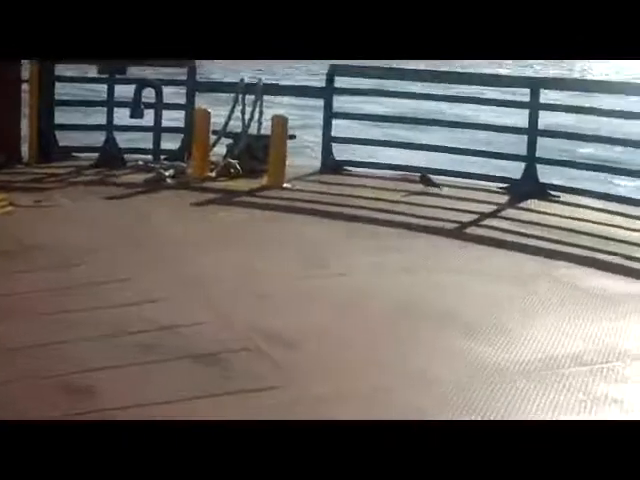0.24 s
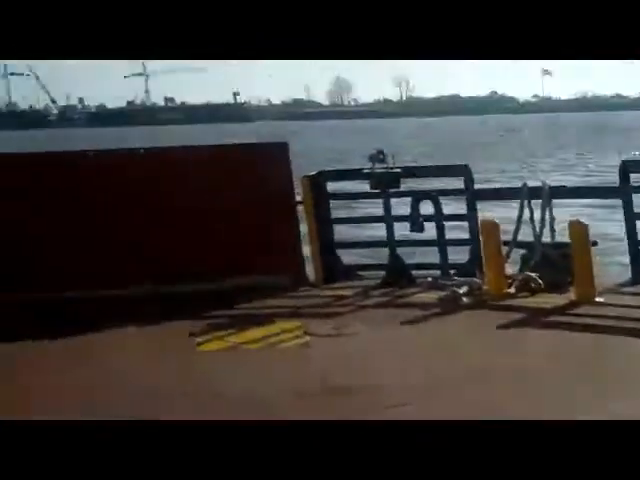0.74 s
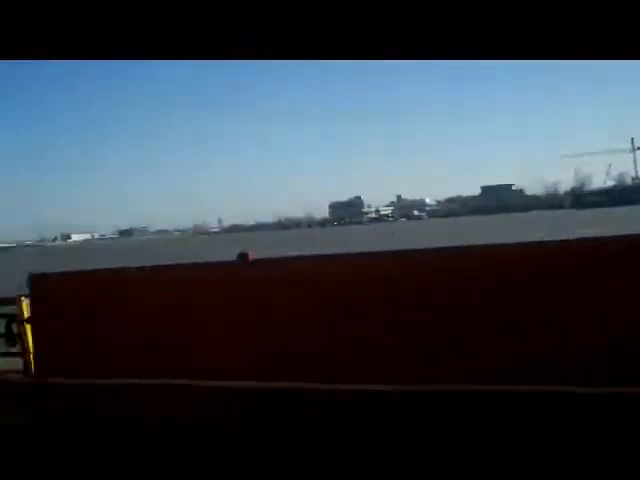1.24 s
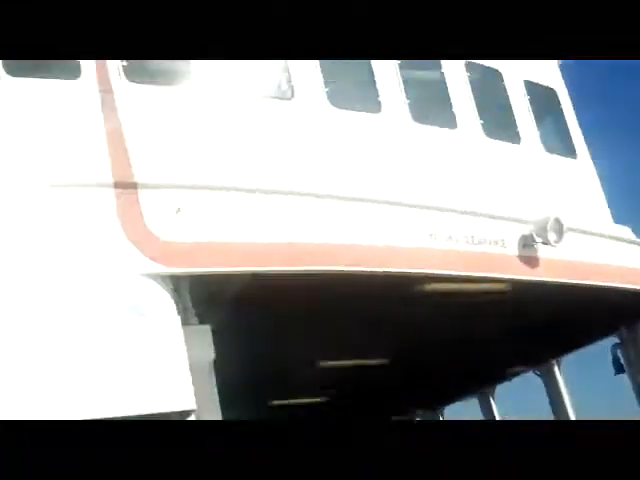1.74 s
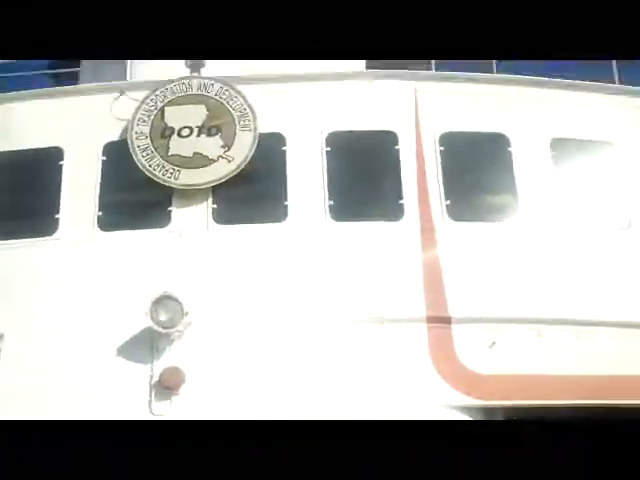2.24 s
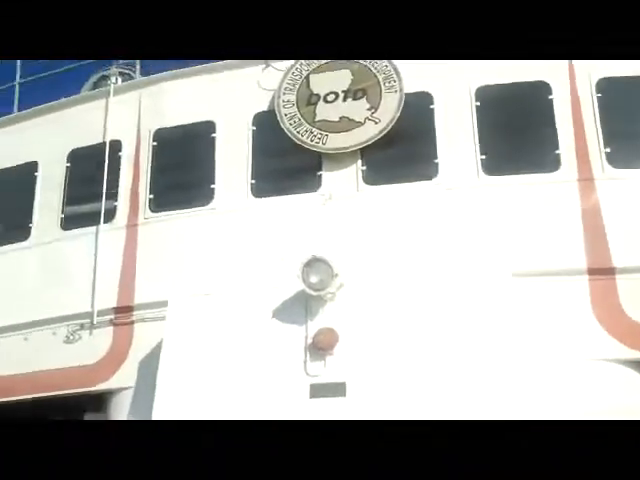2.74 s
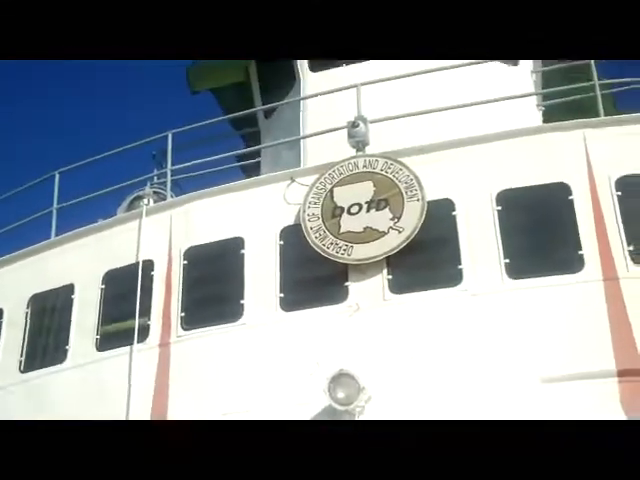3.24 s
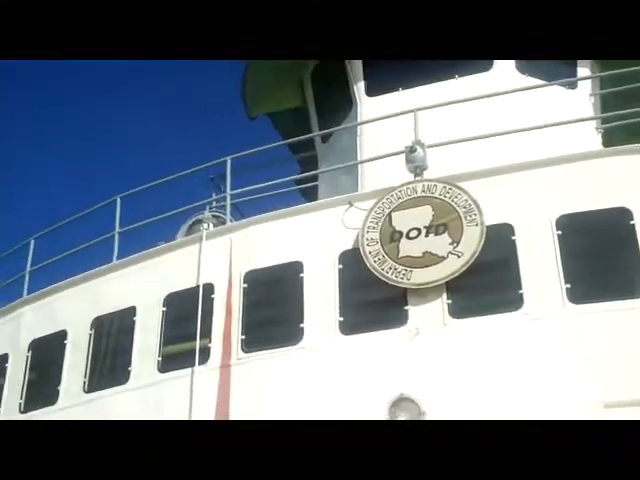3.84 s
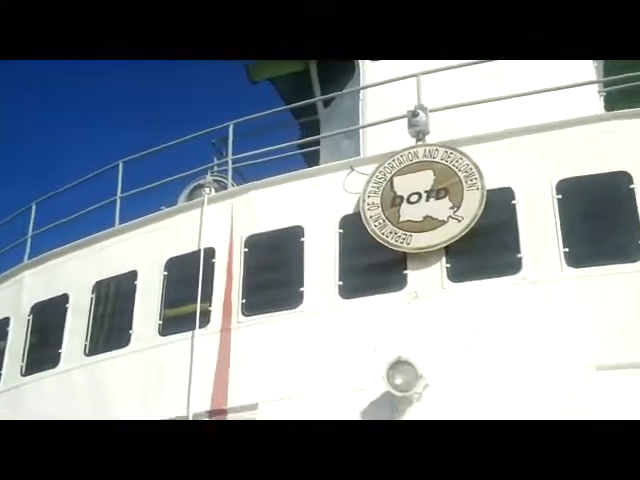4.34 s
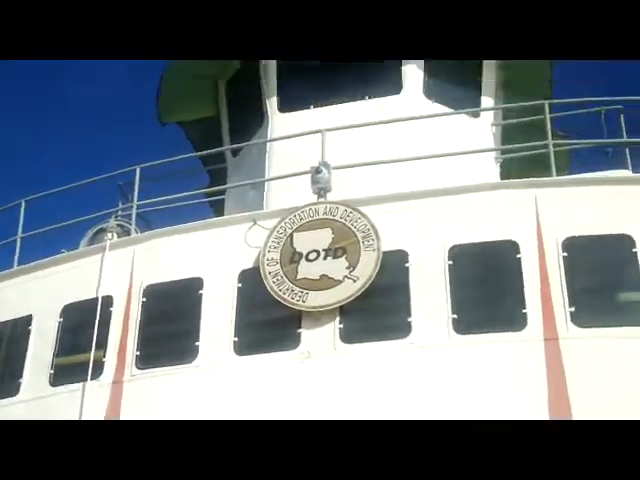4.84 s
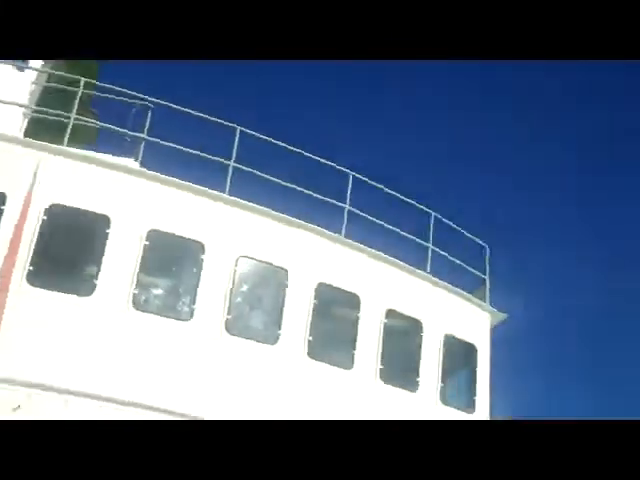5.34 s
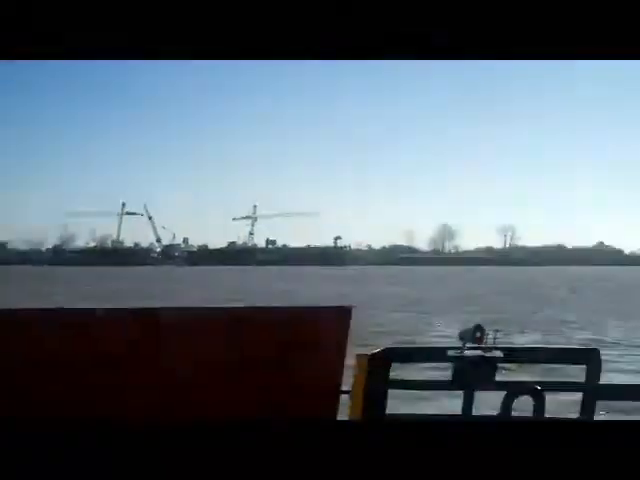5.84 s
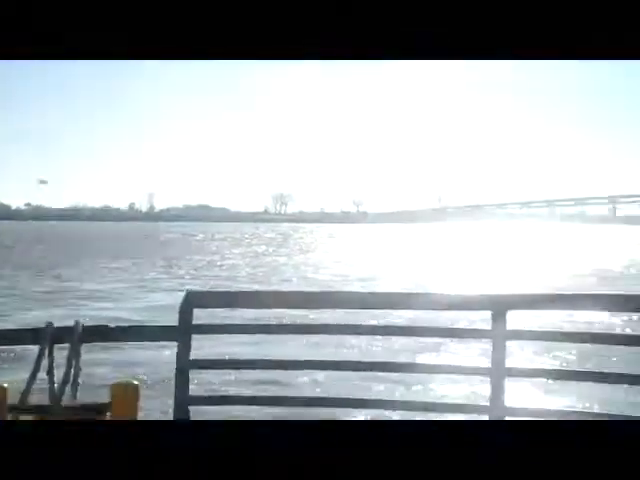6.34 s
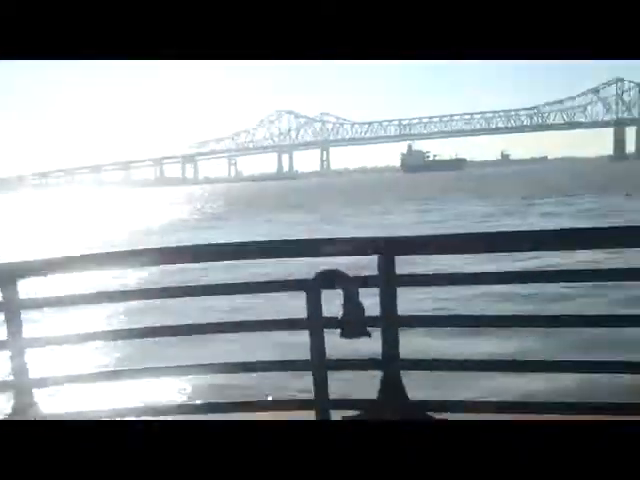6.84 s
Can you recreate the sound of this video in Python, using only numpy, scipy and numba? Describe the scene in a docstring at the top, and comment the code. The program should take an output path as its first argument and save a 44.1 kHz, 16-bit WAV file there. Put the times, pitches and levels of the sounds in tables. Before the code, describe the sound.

For about seven seconds, a river ferry's two diesel engines throb loudly and steadily, heard on the open deck through a hand-held microphone. A generator clatters and fans hum under a roar of exhaust and ventilation, with a faint high hiss on top. Wind rumbles on the microphone throughout, with short, low knocks. At about 0.5 seconds a small bird gives a quiet, thin, gliding two-note whistle. The deep exhaust boom builds by about 1 second and keeps pulsing in slow swells. The camera's plastic case ticks lightly now and then between 1.7 and 6 seconds, most clearly around 2.4, 3.1, 4.8 and 6. Just after 6 seconds the boom dips, a gust lands a short, hollow thump, and the boom surges back. The bird returns very faintly around 6.4 and 6.7 seconds. All along, the rumble overloads slightly, fluttering between left and right.

```python
"""Open deck of a river ferry, hand-held camera microphone. From the start two diesels throb and a
generator clatters under a roar of exhaust and ventilation. Half a second in, a small bird whistles;
then the exhaust boom builds, wind buffets the microphone and the camera's case ticks now and then.
Near six seconds a gust thumps and the bird returns faintly. All along, the rumble overloads two channels
that sit off centre in opposite directions: the left ducks on the crests, the right in the troughs."""
import sys
import numpy as np
from scipy import signal
from scipy.fft import rfft, irfft
from scipy.io import wavfile
from numba import njit

SR = 44100
rng = np.random.default_rng(int(sys.argv[2]) if len(sys.argv) > 2 else 0)


def bounce(signal):
    """Save signal as a 16-bit WAV file at the path given by the first command-line argument."""
    frames = np.transpose(np.atleast_2d(signal))
    limited = np.clip(frames, -1, 1)
    pcm = np.round(limited * 32767).astype(np.int16)
    wavfile.write(sys.argv[1], SR, pcm)


N = 312669
T = np.arange(N) / SR
HZ = np.fft.rfftfreq(N, 1 / SR)


def gain_of(db):
    """Decibels to amplitude."""
    return 10 ** (np.asarray(db) / 20)


def unit_rms(x):
    """Scales to an rms of one."""
    return x / np.sqrt(np.mean(x ** 2) + 1e-20)


def spectrum(points):
    """Joins (f/Hz, level/dB) points on a log axis, giving dB at every frequency."""
    hz, db = np.transpose(points)
    return np.interp(np.log(HZ + 1), np.log(hz + 1), db)


def follow(points):
    """Joins (t/s, value) points, giving a value at every sample."""
    return np.interp(T, *np.transpose(points))


def bell(s, spread_s):
    """A Gaussian swell to one at s seconds."""
    return np.exp(-.5 * ((T - s) / spread_s) ** 2)


def add(mix, s, sound):
    """Mixes a sound in at s seconds."""
    part = mix[round(s * SR):][:len(sound)]
    part += sound[:len(part)]


def wander(rate_hz, count=2048):
    """Random drift of rms one, mostly slower than the rate."""
    hz = np.fft.rfftfreq(count, T[-1] / count)
    slow = irfft(rfft(rng.standard_normal(count)) / np.sqrt(1 + (hz / rate_hz) ** 4))
    return np.interp(T, np.linspace(0, T[-1], count), unit_rms(slow))


def filtered_noise(shape):
    """White noise weighted by a gain at every frequency."""
    return irfft(rfft(rng.standard_normal(N)) * shape, N)


def noise(colour):
    """Noise of rms one; the colour sets only the shape of its spectrum."""
    return unit_rms(filtered_noise(gain_of(spectrum(colour))))


def facing_gain(river_db, cabin_db):
    """A source's gain as the microphone turns between the river and the cabin."""
    # where the microphone points: t/s, direction (0 = open river, 1 = cabin)
    facing = [(0, 0.43), (1.2, 0.69), (2.1, 0.88), (2.6, 0.57), (3.5, 0.86), (4.3, 0.91), (4.8, .75),
              (5.9, 0.7), (6.6, 0.12), (7.09, 0.31)]
    return gain_of(river_db + (cabin_db - river_db) * follow(facing))


def surge():
    """The gain of the machinery's midrange as the breeze carries it across the deck."""
    # rises and dips: t/s, change/dB, spread/s
    surges = [(.21, 2.2, .06), (.48, 1.5, .08), (1.55, 1.5, .06), (2.05, 1.2, .1), (2.55, 1.8, .1),
              (2.92, 1.6, .16), (4.05, -1.2, .1), (4.42, -1.2, .1), (4.73, 2.6, .05), (5.2, 1, .05),
              (5.56, 2, .08), (6.97, -1.3, .14)]
    return gain_of(sum(db * bell(s, spread) for s, db, spread in surges))


def exhaust_boom(in_step_s=1.822, waver_db=.63):
    """Deep exhaust notes, so close in pitch that they beat in slow swells and a quicker throb."""
    # exhaust notes: f/Hz, relative level/dB
    exhausts = [(33.18, -14.8), (32.84, -15.8), (35.02, -19.3)]
    # their joint swell: t/s, gain/dB
    swell = [(0, -5), (.6, -8), (1.15, 1.8), (2.3, 0.25), (2.6, -2.5), (3.1, -1), (5.2, 0), (5.6, -3),
             (5.85, 1.5), (6.05, -8), (6.17, -9.5), (6.35, 5.5), (6.7, 1.5), (7.09, 2)]
    notes = sum(gain_of(db + waver_db * wander(3)) * np.cos(2 * np.pi * hz * (T - in_step_s))
                for hz, db in exhausts)
    return gain_of(follow(swell)) * np.sqrt(2) * notes


def engine(swell, orders, shaft_hz, trim_db, waver_db, hunt):
    """Orders of one shaft whose speed hunts a little; moving air makes each order waver."""
    turns = np.cumsum(shaft_hz * (1 + hunt * wander(1.3))) / SR
    tones = sum(gain_of(db + waver_db * wander(2.2)) * np.sin(2 * np.pi * (order * turns + rng.random()))
                for order, db in orders)
    return gain_of(follow(swell) + trim_db) * np.sqrt(2) * tones


def diesels():
    """The ferry's two engines, running at slightly different speeds."""
    # each engine as heard on deck: t/s, relative level/dB
    first_swell = [(0, -24), (1, -23), (2.3, -19.5), (3.2, -21.5), (4.3, -17), (5.5, -16.5), (7.09, -19.5)]
    second_swell = [(0, -22.5), (.55, -21), (1.4, -22), (1.8, -26.5), (3.15, -30), (3.55, -21.5),
                    (4.9, -17), (6, -17.5), (6.4, -25), (6.8, -18), (7.09, -22.5)]
    # their tones: multiple of the shaft speed, relative level/dB
    first_orders = [(4, -14), (6, 0), (8, -7.5), (9, -9), (37, -26.5)]
    second_orders = [(7, -7), (8, -15.5), (10, -3), (20, -18.5)]
    first = engine(first_swell, first_orders, shaft_hz=11.64, trim_db=-1.1, waver_db=.9, hunt=.0025)
    second = engine(second_swell, second_orders, shaft_hz=11.315, trim_db=.74, waver_db=1.9, hunt=.002)
    return first + second


def hum_swells(trim_db=-.2):
    """Single low notes rise out of the rumble and sink back."""
    # brief notes: t/s, f/Hz, relative level/dB, spread/s
    notes = [(.4, 65.5, -16, .14), (.95, 98, -18, .07), (.95, 136, -20, .07), (1.38, 136, -19, .06),
             (1.51, 91, -18, .07), (1.51, 109, -18, .05), (2.08, 78, -19, .08), (2.08, 114, -17, .05),
             (2.42, 67, -18, .1), (2.5, 80, -18, .07), (2.56, 108, -15, .07), (2.8, 106, -17, .06),
             (3.14, 136, -19, .06), (3.8, 111, -16, .08), (3.92, 84, -18, .08), (4.3, 112, -19, .1),
             (4.35, 71, -15, .05), (4.45, 82, -17, .1), (5.55, 86, -20, .06), (5.47, 70, -15, .08),
             (6.18, 112, -16, .07), (6.28, 82, -18, .13), (6.92, 112, -15, .05), (6.9, 90, -19, .08)]
    hums = sum(gain_of(db + trim_db) * bell(s, spread) * np.sin(2 * np.pi * (hz * T + rng.random()))
               for s, hz, db, spread in notes)
    return np.sqrt(2) * hums


def generator(cycle_hz=15.105, firings=3, firing_db=2, between_db=-1, hunt=.0013, hum_order=9):
    """A fast diesel repeats one cycle of knocks and valve clatter at governed speed, above a low hum."""
    # clatter spectrum: f/Hz, relative level/dB per order
    colour = [(150, -39), (300, -43), (550, -52), (900, -49.5), (1200, -54.5), (1500, -64), (1750, -63.5),
              (2100, -61), (2400, -66.5), (3200, -73), (4000, -81)]
    # tones that stand out: multiple of the cycle rate, relative level/dB
    strong_orders = [(13, -36), (18, -32), (45, -47.5), (51, -45.5), (57, -44), (61, -45), (63, -46.5),
                     (66, -46), (72, -42), (81, -46), (114, -55), (132, -60)]
    # low hum: t/s, level/dB
    hum_level = [(0, -24), (1.1, -22.5), (1.8, -30), (2.5, -29.5), (3.1, -25.5), (4.2, -25), (4.7, -29.5),
                 (7.09, -26)]
    orders, size = np.arange(1, 260), 8192
    levels_db = np.interp(orders * cycle_hz, HZ, spectrum(colour))
    levels_db += np.where(orders % firings, between_db, firing_db)
    for order, db in strong_orders:
        levels_db[round(order) - 1] = db
    partials = gain_of(levels_db) * np.exp(2j * np.pi * rng.random(len(orders)))
    cycle = irfft(np.append(0, partials), size) * size / np.sqrt(2)
    turns = np.cumsum(cycle_hz * (1 + hunt * wander(.97))) / SR
    clatter = np.interp(turns, np.arange(size) / size, cycle, period=1)
    hum = np.sqrt(2) * np.sin(2 * np.pi * hum_order * turns) * gain_of(follow(hum_level))
    return clatter * facing_gain(river_db=-5, cabin_db=0) * surge() + hum


def deck_roar(firing_hz=30, throb=.057, flutter_db=.47, wall_db=-32):
    """Exhaust and ventilation noise, pulsing with the firings and fluttering in the breeze."""
    # low, middle and high bands, and the hollow ring off the cabin wall: f/Hz, relative level/dB
    rumble_colour = [(60, -10.5), (200, -3), (310, 2), (400, -6), (470, -4), (600, -10), (900, -17),
                     (3000, -63)]
    roar_colour = [(250, -9), (550, -2), (720, 2.5), (900, 2), (1130, 2.5), (1350, -1.5), (1600, -8.5),
                   (2100, -18.5), (3000, -40.5), (8000, -69)]
    rush_colour = [(600, -15), (1500, 3), (2050, 1.5), (2700, -5), (3700, -7.5), (4700, -12.5), (6000, -18),
                   (8000, -26), (15000, -40)]
    wall_colour = [(550, -35), (760, -1), (920, 1), (1100, 1), (1300, -8), (1700, -40)]
    firing = 1 + throb * np.sin(2 * np.pi * np.cumsum(firing_hz + .78 * wander(3.3)) / SR)
    rumble = noise(rumble_colour) * facing_gain(river_db=-28.5, cabin_db=-24)
    roar = noise(roar_colour) * facing_gain(river_db=-29, cabin_db=-28.5)
    roar += noise(wall_colour) * gain_of(wall_db) * bell(2.85, spread_s=.42)
    rush = noise(rush_colour) * facing_gain(river_db=-44, cabin_db=-35)
    flutter = gain_of(flutter_db * wander(6.7))
    return (rumble * firing + (roar * firing + rush) * surge()) * flutter


def wind(breeze_db=-13.5, lump_db=1.2, lumps_hz=10, gust_db=-6):
    """Low turbulence right on the microphone arrives in lumps; the strongest gusts are brighter."""
    # gusts and lulls: t/s, change/dB, spread/s, extra brightness/dB
    gusts = [(.1, 1, .11, 2), (1.75, -1.5, .35, 0), (3.1, -2.3, .2, 4), (4.25, 2, .14, 0)]
    # the deep breeze and its brighter layer: f/Hz, relative level/dB
    breeze_colour = [(3, -7.5), (8, 5), (25, 4), (55, -1.5), (85, 2.5), (120, 0.4), (160, -4), (220, -9),
                     (300, -24), (600, -41.5), (2000, -96)]
    gust_colour = [(60, -15), (170, -1), (240, 2), (330, -5), (500, -12.5), (1500, -48.5)]
    rise_db = sum(db * bell(s, spread) for s, db, spread, _ in gusts)
    bright_db = sum(db * bell(s, spread) for s, _, spread, db in gusts)
    level_db = breeze_db + rise_db + lump_db * wander(lumps_hz)
    breeze = noise(breeze_colour) * gain_of(level_db)
    return breeze + noise(gust_colour) * gain_of(2 * level_db + gust_db + bright_db)


def buffets(trim_db=-3, spread_s=.0021):
    """Single eddies strike the diaphragm, each a short push or pull."""
    # eddies: t/s, relative pressure
    eddies = [(.777, -1.54), (1.126, 1.5), (1.476, -1.5), (1.671, 1), (2.186, 2), (2.352, -0.9),
              (3.475, 1.3), (4.58, -0.5), (4.63, 2.5), (5.625, 2), (5.788, -2.5), (6.222, 2.2), (6.264, -2),
              (6.361, -2.5), (6.463, 2)]
    return gain_of(trim_db) * sum(push * bell(s, spread_s) for s, push in eddies)


def gust_thump(at_s=6.115, spread_s=.035, level_db=-16):
    """One gust lands a short, hollow blow on the microphone."""
    # spectrum of the blow: f/Hz, relative level/dB
    colour = [(70, -22), (140, 1), (210, -1), (300, -0.5), (400, -13.5), (600, -19), (1200, -55)]
    return noise(colour) * gain_of(level_db) * bell(at_s, spread_s)


def drone(hunt=.0065, waver_db=3):
    """A beating pair of machine tones that waver in the moving air."""
    # the two tones: f/Hz, relative level/dB
    pair = [(466.6, -3), (478, -7)]
    # their joint swell: t/s, gain/dB
    swell = [(0, -38), (.4, -34), (1.1, -44), (1.9, -35), (2.6, -31), (3.7, -39.5), (4.1, -47),
             (5.6, -43.5), (7.09, -38.5)]
    tones = np.zeros(N)
    for hz, db in pair:
        amplitude = gain_of(db + waver_db * wander(3.7))
        phase = 2 * np.pi * np.cumsum(hz * (1 + hunt * wander(4))) / SR
        tones += amplitude * np.sin(phase)
    return np.sqrt(2) * gain_of(follow(swell)) * tones


def pumps_and_fans():
    """Narrow, unsteady hums and whines, clearest with the microphone towards the cabin."""
    # noise bands: f/Hz, width/Hz, relative level/dB
    bands = [(211.8, 6.2, -34.5), (259, 3, -38), (344.8, 9.6, -40), (424.4, 60, -38), (471.5, 26, -38.5),
             (930, 13, -42.5), (1048, 14, -46)]
    shape = sum(gain_of(db) / np.sqrt(width) * np.exp(-2 * ((HZ - hz) / width) ** 2)
                for hz, width, db in bands)
    return facing_gain(river_db=-6, cabin_db=1.5) * np.sqrt(SR / 2) * filtered_noise(shape)


def camera_ticks(trim_db=-6.5, t60_s=.014):
    """The plastic case, right by the microphone, gives brief, well damped rings."""
    # ticks: t/s, relative peak level/dB, f/Hz, width/Hz
    ticks = [(1.7096, -26, 9300, 1500), (2.4036, -15, 4300, 900), (2.403, -21, 3280, 700),
             (3.082, -29, 6900, 2500), (3.093, -18, 3570, 900), (3.651, -28, 6930, 2000),
             (4.812, -30, 9500, 5000), (4.819, -18, 8800, 8600), (4.82, -21, 6340, 2800),
             (4.836, -35, 9000, 3000), (5.486, -25, 8450, 1300), (5.9956, -15.5, 4330, 1050),
             (5.9965, -22, 3250, 606)]
    out, t = np.zeros(N), np.arange(SR // 20) / SR
    for s, db, hz, width in ticks:
        band = signal.butter(4, [hz - width / 2, hz + width / 2], "band", fs=SR, output="sos")
        burst = rng.standard_normal(len(t)) * gain_of(-60 * t / t60_s)
        ring = signal.sosfilt(band, burst)
        add(out, s, gain_of(db + trim_db) * ring / abs(ring).max())
    return out


def bird(octave_db=-15, echo_db=-13.5, echo_s=.05, split_hz=5400, jitter=.0035):
    """Thin, gliding whistles: the low note is reedy, the high ones echo faintly off the cabin wall."""
    # notes: t/s, length/s, level/dB, change over the note/dB, mid-note dip/dB, then f/Hz at even steps
    notes = [(.515, .062, -45.5, 4, 0, 5040, 5110, 5030),
             (.577, .203, -41.5, -7, -7, 6130, 5830, 5700, 5680, 5730, 5840, 5610),
             (6.405, .036, -59, -2, 0, 6340, 6860), (6.742, .118, -61, -4, 0, 6300, 5920)]
    out = np.zeros(N)
    for s, length, level_db, change_db, dip_db, *bend_hz in notes:
        along = np.linspace(0, 1, round(length * SR))
        glide = np.polyfit(np.linspace(0, 1, len(bend_hz)), bend_hz, len(bend_hz) - 1)
        hz = np.polyval(glide, along)
        phase = 2 * np.pi * np.cumsum(hz * (1 + jitter * wander(120)[:len(hz)])) / SR
        octave = gain_of(octave_db) * np.sin(2 * phase) * (hz < split_hz)
        loudness_db = level_db + change_db * along + dip_db * np.sin(np.pi * along) ** 10
        envelope = np.sqrt(2) * gain_of(loudness_db) * signal.windows.tukey(len(hz), .1)
        whistle = envelope * (np.sin(phase) + octave)
        add(out, s, whistle)
        add(out, s + echo_s, gain_of(echo_db) * whistle * (hz > split_hz))
    return out


def high_hiss(apart_db=-4, fizz_db=-.5):
    """Fine, fizzing high hiss, partly different in each channel."""
    # hiss spectrum: f/Hz, relative level/dB
    colour = [(2000, -19), (5000, -0.5), (7500, 4.5), (10000, 1), (12500, -2.5), (14000, -8), (15600, -18)]
    # its swell: t/s, gain/dB
    swell = [(0, -61.5), (1.4, -54.5), (3, -57.5), (4.9, -53.5), (6.15, -55.5), (6.7, -60), (7.09, -62.5)]
    sides = gain_of(apart_db) * np.array([noise(colour), noise(colour)])
    return (noise(colour) + sides) * gain_of(follow(swell) + fizz_db * wander(78))


def cabin_whine(hz=12100, width_hz=190):
    """A narrow band of hiss from the machinery behind the cabin wall."""
    # the whine as heard on deck: t/s, level/dB
    level = [(0, -90), (1.5, -76), (1.85, -67), (3.1, -68.5), (3.4, -74), (5.5, -72), (6.2, -88)]
    band = np.exp(-2 * ((HZ - hz) / width_hz) ** 2)
    return gain_of(follow(level)) * unit_rms(filtered_noise(band))


@njit
def limiter_gain(x, fall, overshoot, hold, rise):
    """An overload sends the gain down a little too far; it is held a moment, then climbs back to one."""
    gains, gain, since = np.empty_like(x), 1.0, np.inf
    for i in range(len(x)):
        since = 0.0 if abs(x[i] * gain) > 1 else since + 1
        if since < overshoot:
            gain *= fall
        elif since > hold:
            gain = min(gain + rise, 1.0)
        gains[i] = gain
    return gains


def scene():
    """The deck at one microphone, fed to both channels, with a fine high hiss on top."""
    engines = diesels() + exhaust_boom() + hum_swells()
    auxiliaries = generator() + drone() + pumps_and_fans() + cabin_whine()
    breeze = wind() + gust_thump() + buffets()
    return engines + auxiliaries + breeze + deck_roar() + bird() + camera_ticks() + high_hiss()


def record(dry, drive_db=1.5, offset=.224, attack_s=.003, overshoot_s=.0012, hold_s=.0086,
           release_s=.028, step_db=.56, knee=70, edge_hz=15400):
    """Opposite offsets trip the two limiters in turn, so the sound flutters between the ears."""
    # the recorder's dull treble: f/Hz, gain/dB
    treble = [(8500, 0), (11500, -1.5), (13500, -3.5), (15500, -5)]
    loud = dry * gain_of(drive_db) + np.array([[offset], [-offset]])
    fall, rise = np.exp(-1 / (attack_s * SR)), 1 / (release_s * SR)
    gains = np.array([limiter_gain(side, fall, overshoot_s * SR, hold_s * SR, rise) for side in loud])
    ladder = gain_of(-np.cumsum(step_db * rng.uniform(0, 1.8, 200)))  # uneven gain steps crackle faintly
    ducked = loud * np.append(1, ladder)[np.searchsorted(-ladder, -gains)]
    flattened = ducked / (1 + abs(ducked) ** knee) ** (1 / knee)
    hz = np.linspace(0, SR / 2, 513)
    response = np.interp(hz, HZ, gain_of(spectrum(treble))) * (hz < edge_hz)
    low_pass = signal.firwin2(255, hz, response, window=("kaiser", 7), fs=SR)
    padded = np.pad(flattened, ((0, 0), (len(low_pass) // 2,) * 2), "edge")
    return signal.oaconvolve(padded, low_pass[None], "valid")


dry = scene()
out = record(dry)
bounce(out)
```